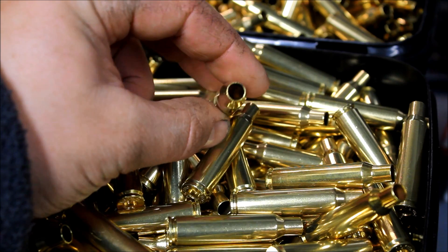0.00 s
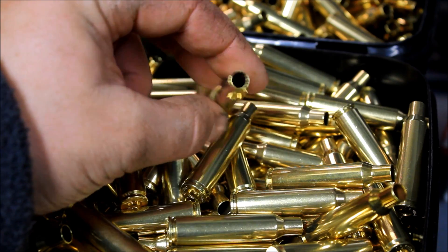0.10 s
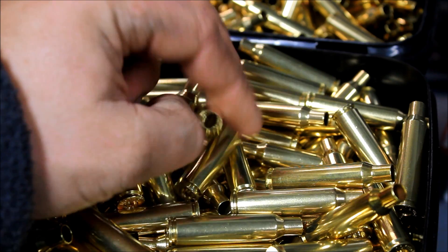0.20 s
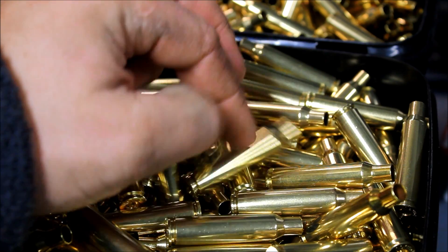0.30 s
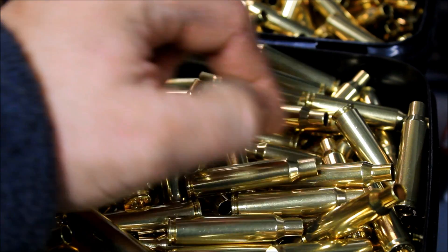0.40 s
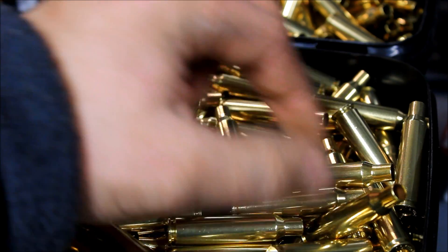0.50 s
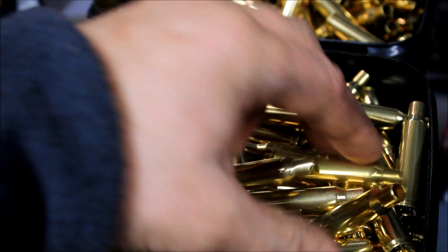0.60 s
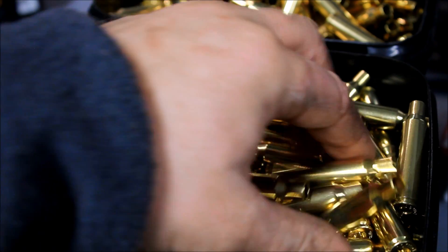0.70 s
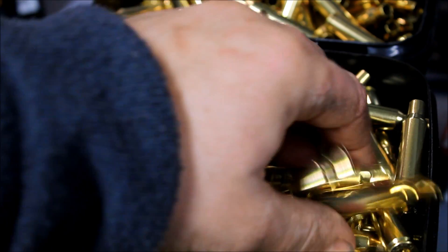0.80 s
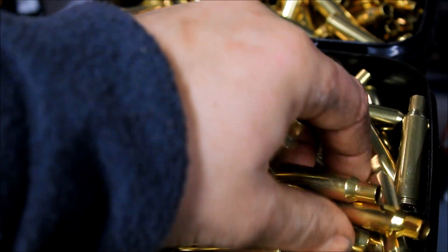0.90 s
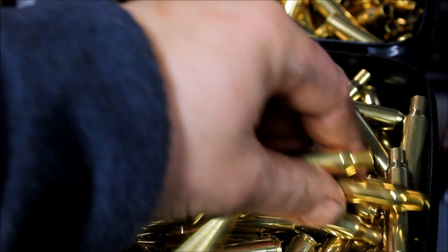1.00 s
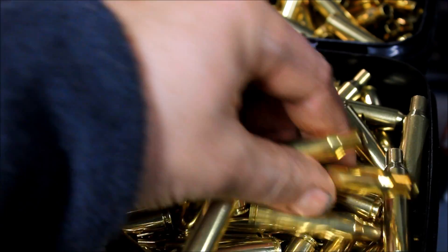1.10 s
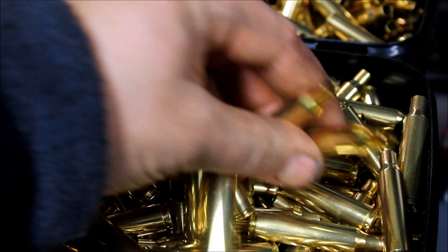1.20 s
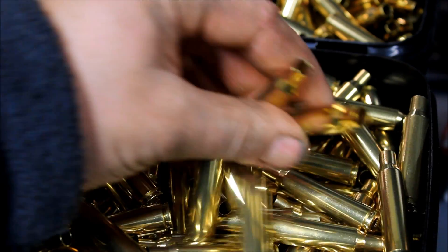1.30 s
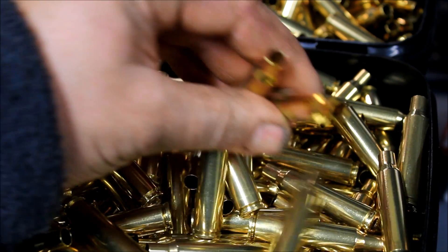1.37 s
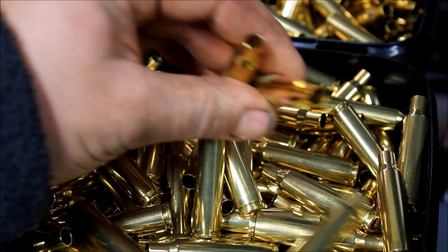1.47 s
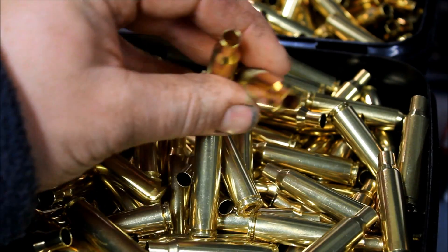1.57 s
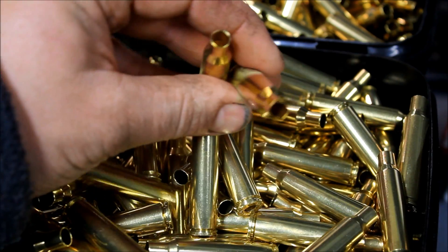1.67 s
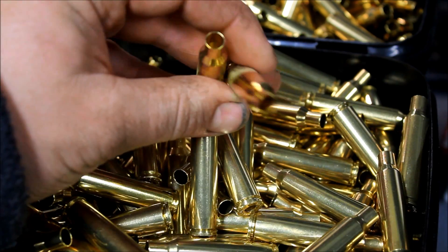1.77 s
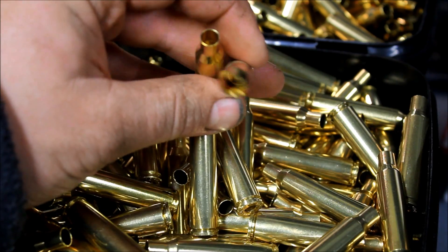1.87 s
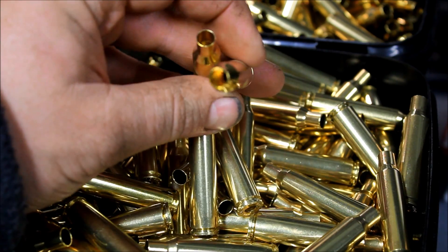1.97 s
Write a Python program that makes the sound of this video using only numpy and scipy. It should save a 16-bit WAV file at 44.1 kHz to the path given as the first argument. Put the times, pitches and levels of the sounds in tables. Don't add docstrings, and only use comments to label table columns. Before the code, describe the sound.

Empty brass cartridge cases clink and jingle as a hand stirs a full plastic tub, pauses briefly, digs in harder, then lifts a few and settles; close microphone in a small, quiet workshop with faint hum.

```python
import sys
import numpy as np
from scipy import signal
from scipy.fft import rfft, irfft
from scipy.io import wavfile
from scipy.ndimage import uniform_filter1d

SR = 44100
rng = np.random.default_rng(int(sys.argv[2]) if len(sys.argv) > 2 else 0)


def master_out(mix):
    frames = np.transpose(np.atleast_2d(mix))
    ceiling = np.clip(frames, -1, 1)
    pcm = np.round(ceiling * 32767).astype(np.int16)
    wavfile.write(sys.argv[1], SR, pcm)


def to_linear_factor(level_db):
    exponent = np.asarray(level_db, float) / 20
    return 10 ** exponent


N = 90405


def evened(x):
    return x / np.sqrt(np.mean(x ** 2) + 1e-20)


def coloured(x, points):
    f, level = np.transpose(points)
    hz = abs(np.fft.fftfreq(2048, 1 / SR))
    gain_db = np.interp(np.log(hz + 1), np.log(f), np.maximum(level, -90))
    log_gain = np.log(to_linear_factor(gain_db))
    taps = np.fft.ifft(np.exp(np.conj(signal.hilbert(log_gain)))).real
    taps = max(taps[:1024], taps[::-1][:1024], key=np.linalg.norm)
    return signal.oaconvolve(x, taps / np.linalg.norm(taps))[:len(x)]


def mode(hz, t60, length=.4):
    t = np.arange(int(length * SR)) / SR
    return np.sin(2 * np.pi * hz * t) * to_linear_factor(-60 * t / max(t60, .004))


def add(mix, s, sound):
    part = mix[round(s * SR):][:len(sound)]
    part += sound[:len(part)]


# f/Hz, level/dB
HISS_COLOUR = [(25, -6), (60, -16.5), (160, -17), (300, 1), (700, -7.5), (2100, -8.5), (6000, -22.5),
               (16000, -29)]
# f/Hz, level/dB rms
HUM_PARTIALS = [(100, -63), (297, -59.5), (395, -66)]


def workshop():
    hiss_db, waver_db = -49, 5.1
    t = np.arange(N) / SR
    hum = np.zeros(N)
    for hz, db in HUM_PARTIALS:
        waver = evened(uniform_filter1d(rng.standard_normal(N), 4000))
        tone = np.sin(2 * np.pi * (hz * t + rng.random()))
        hum += np.sqrt(2) * to_linear_factor(db + waver_db * waver) * tone
    f, level = np.transpose(HISS_COLOUR)
    hz = np.fft.rfftfreq(N, 1 / SR)
    gain = to_linear_factor(np.interp(np.log(hz + 1), np.log(f), level))
    hiss = irfft(rfft(rng.standard_normal(N)) * gain, N)
    return hum + to_linear_factor(hiss_db) * evened(hiss)


def ducking(x):
    from_db, share, memory_s, delay_s = -25, 0.72, 0.3, 0.23
    keep, lag = np.exp(-1 / (memory_s * SR)), np.exp(-1 / (delay_s * SR))
    power = signal.lfilter([1 - keep], [1, -keep], x ** 2)
    power = signal.lfilter([1 - lag], [1, -lag], power)
    excess_db = np.maximum(10 * np.log10(power + 1e-12) - from_db, 0)
    return to_linear_factor(-share * excess_db)


# t/s, peak level/dB, t60/s
LOW_RINGS = [(0.0727, -45, 0.13), (0.1511, -29.5, 0.062), (0.237, -31, 0.082), (0.252, -6.5, 0.17),
             (0.324, -16, 0.1), (0.3513, -19, 0.12), (0.39, -19.5, 0.14), (0.408, -25, 0.13),
             (0.4343, -10, 0.13), (0.446, -21, 0.16), (0.4985, -25, 0.059), (0.678, -4.5, 0.11),
             (0.6996, -10.5, 0.062), (0.7315, -16, 0.068), (0.801, -30, 0.055), (0.834, -9.5, 0.084),
             (0.845, -28.5, 0.086), (0.861, -22, 0.14), (0.869, -8, 0.076), (0.8744, -10.5, 0.14),
             (0.8838, -1, 0.12), (0.9034, -6, 0.045), (0.9262, -14.5, 0.18), (0.9754, -28, 0.15),
             (1.025, -14, 0.11), (1.0345, -18, 0.091), (1.105, -7.5, 0.12), (1.122, -23, 0.098),
             (1.2025, -6, 0.12), (1.242, -19, 0.16), (1.2857, -25.5, 0.12), (1.3324, -21, 0.11),
             (1.3455, -21.5, 0.14), (1.376, -13.5, 0.074), (1.3951, -4, 0.068), (1.417, -4, 0.14),
             (1.4319, -10.5, 0.073), (1.4689, -29, 0.12), (1.5706, -25.5, 0.074), (1.607, -40.5, 0.084),
             (1.6236, -17, 0.13), (1.6462, -21.5, 0.1), (1.7343, -22, 0.088)]
MID_RINGS = [(0.1501, -41, 0.099), (0.2369, -20, 0.11), (0.2593, -9, 0.068), (0.3242, -7, 0.065),
             (0.3576, -16, 0.1), (0.3925, -9, 0.094), (0.4414, -11, 0.12), (0.4579, -11, 0.062),
             (0.4985, -26, 0.089), (0.6764, -13.5, 0.12), (0.7003, -12, 0.082), (0.7277, -6, 0.11),
             (0.754, -8, 0.044), (0.837, -25, 0.098), (0.8674, -20.5, 0.1), (0.8944, -8, 0.12),
             (0.9075, -13, 0.11), (1.0243, -26, 0.12), (1.077, -37, 0.082), (1.096, -17, 0.12),
             (1.112, -4, 0.052), (1.2025, -4, 0.066), (1.239, -21, 0.12), (1.284, -22, 0.1),
             (1.3465, -16, 0.13), (1.3753, -16, 0.15), (1.397, -13.5, 0.086), (1.4165, -2.5, 0.055),
             (1.4315, -11.5, 0.099), (1.4556, -16.5, 0.17), (1.5818, -29, 0.11), (1.6062, -24.5, 0.14),
             (1.6197, -30, 0.11), (1.7367, -28.5, 0.12), (1.7558, -19.5, 0.16), (1.9555, -63.5, 0.19)]
TOP_RINGS = [
    (.2124, -23, 0.11),
    (.2523, -17, .08),
    (.341, -26, .1),
    (.4574, -16, 0.089),
    (.7527, -18, 0.092),
    (.831, -26, 0.065),
    (.8838, -18, 0.12),
    (1.372, -21, 0.11),
    (1.6437, -31, .1),
]
LOW_CASE_HZ = [9960, 9850, 9700, 9700, 9650, 9710, 9720, 9700, 9670, 9600, 9690, 9700, 9680, 9730, 9690,
               9930, 10160, 9900, 9740, 9750, 9660, 9670, 9650, 9640, 9700, 9830, 9800, 9810, 9630, 9920,
               9630, 9690, 9650, 9650, 9670, 9680, 9700, 9690, 9710, 9930, 9680, 9720, 9750]
MID_CASE_HZ = [12920, 13000, 13000, 12920, 12960, 12950, 12840, 12950, 12950, 12930, 12980, 12950, 12970,
               13040, 12930, 13020, 13030, 12990, 13180, 13000, 13040, 12910, 13010, 12910, 12950, 12920,
               12930, 12960, 13000, 12970, 12970, 12970, 12930, 12920, 12930, 13120]
TOP_CASE_HZ = [15430, 15450, 15430, 15710, 15700, 15700, 15690, 15550, 15700]


def rings(table, cases_hz):
    split_hz, twin_db = 52, -16.5
    linger_db, linger_t60_s = -37.5, 0.83
    rise_s, mute_db, rough_db = .0022, -5, 2.3
    out = np.zeros(N)
    chance = rng.uniform(-1.006, 1, (len(table), 2))
    t = np.arange(int(.4 * SR)) / SR
    following = [row[0] for row in table[1:]] + [N / SR]
    for (s, db, t60), hz, (a, b), then in zip(table, cases_hz, chance, following):
        twin = mode(hz + split_hz * (a + np.sign(a)), t60)
        pair = mode(hz, t60) + to_linear_factor(twin_db) * twin
        pair = pair * to_linear_factor(mute_db * np.clip((t + s - then) / .002, 0, 1))
        pair = pair + to_linear_factor(linger_db) * mode(hz + split_hz * b, linger_t60_s)
        add(out, s, to_linear_factor(db - 2.5) * np.minimum(t / rise_s, 1) * pair)
    rough = uniform_filter1d(uniform_filter1d(rng.standard_normal(N), 150), 100)
    return out * to_linear_factor(rough_db * evened(rough))


# t/s, peak level/dB, tub thud level/dB re peak
KNOCKS = [(.15, -27.5, -8), (.2131, -20, -19), (.2365, -14, -14.5), (.2522, -15.5, -21.5),
          (.3236, -7, -12.5), (.35, -19.5, -13), (.389, -17.5, -11), (.43, -21.5, -13),
          (.4405, -10, -13.5), (.456, -6, -18), (.4977, -22, -12), (.675, -14, -22),
          (.6987, -18, -31), (.7136, -13, -19.5), (.7391, -7.5, -23), (.7757, -8, -11.5),
          (.7935, -12.5, -27), (.8308, -5.5, -20.5), (.8385, -7, -24), (.86, -6.5, -22.5),
          (.8735, -7, -24.5), (.8842, -12, -48), (.9015, -12, -45), (.9152, -12, -24),
          (.944, -14, -25),
          (1.003, -21, -34), (1.0249, -8, -19.5), (1.0772, -22.5, -15), (1.093, -24.5, -35),
               (1.1025, -5.5, -23.5), (1.112, -9.5, -19.5), (1.1437, -20.5, -12.5), (1.171, -20.5, -20),
               (1.1993, -11.5, -23), (1.2402, -25.5, -25), (1.2824, -18.5, -30), (1.302, -14, -16.5),
               (1.345, -22.5, -31.5), (1.364, -25, -23), (1.3719, -24.5, -11.5), (1.3939, -9.5, -20.5),
               (1.4166, -15.5, -14), (1.4321, -14, -18.5), (1.5644, -26.5, -16), (1.5877, -24, -19),
               (1.6125, -17.5, -19.5), (1.6423, -20.5, -18), (1.6776, -30.5, -40), (1.73, -19, -17),
               (1.7537, -13, -19), (1.9165, -42, -8), (1.957, -41, -2.5)]
# f/Hz, level/dB, t60/s
TUB_MODES = [(240.7, -2, 0.11), (288, -5.5, 0.13), (387.4, -0.5, 0.066), (523, -3.5, 0.094),
             (607, -1, 0.047), (719.7, 1, 0.074), (802, -1, 0.051)]


def knocks():
    tick_t60_s, scatter_t60_s = 0.0011, 0.095
    knock_db, front_db, grit_db, tub_db = -12, 3, 3.5, -5
    table, t = KNOCKS, np.arange(8000) / SR
    crack, thud = np.zeros(N), np.zeros(N)
    grit = rng.standard_normal((len(table), len(t), 2))
    detune = rng.uniform(0.92, 1.03, (len(table), len(TUB_MODES)))
    for (s, db, thud_db), noise, shift in zip(table, grit, detune):
        lumps = to_linear_factor(grit_db * evened(uniform_filter1d(noise[:, 1], 40)))
        scatter = lumps * to_linear_factor(-60 * t / scatter_t60_s)
        tick = to_linear_factor(front_db - 60 * t / tick_t60_s)
        add(crack, s, to_linear_factor(db + knock_db) * (scatter + tick) * noise[:, 0])
        wall = sum(to_linear_factor(d) * mode(f * k, ring) for (f, d, ring), k in zip(TUB_MODES, shift))
        rise = np.minimum(np.arange(len(wall)) / (0.004 * SR), 1)
        add(thud, s, to_linear_factor(db + thud_db + tub_db) * wall * rise)
    return crack, thud


# t/s, peak level/dB, f/Hz
TICKS = [(.15, -29, 4000), (0.2538, -11, 7500), (0.3231, -3.5, 3600), (0.3248, -6, 5540),
         (.456, -5.5, 3790), (0.456, 0, 5400), (0.7758, -2.5, 3700), (.794, -5, 4040), (.831, -12, 6500),
         (0.8393, -1.5, 4200), (0.8744, -5, 3000), (.8845, -2, 7800), (0.9, -17, 7000), (.951, -23, 4040),
         (1.0248, -15, 4350), (1.104, -7, 4140), (1.1119, -3, 3900), (1.1433, -16, 3600),
         (1.2012, -13.5, 5500), (1.2817, -23, 3850), (1.3068, -15.5, 5000), (1.3458, -17, 6500),
         (1.364, -29, 4360), (1.372, -18.5, 3500), (1.3762, -8, 6300), (1.3958, -11.5, 4300),
         (1.417, -26, 7500), (1.431, -30, 7500), (1.587, -20.5, 3500), (1.73, -22, 4000),
         (1.956, -39, 3900)]


def ticks():
    ring_s, snap_db, ticks_db = .008, -3, -8.5
    out = np.zeros(N)
    for s, db, hz in TICKS:
        snap = mode(1.6 * hz, .004, .03) + mode(.55 * hz, .004, .03)
        add(out, s, to_linear_factor(db + ticks_db) * (mode(hz, ring_s, .03) + to_linear_factor(snap_db) * snap))
    return out


# start t/s, end t/s, rattle level/dB, tube air level/dB re rattle
STIR = [
    (0.197, 0.495, -43, -4.5),
    (0.698, 0.793, -27.5, -4.5),
    (0.85, 0.905, -32, -1.5),
    (0.96, 1.04, -39.5, 0.5),
    (1.024, 1.11, -38, -19),
    (1.277, 1.46, -38, -29.5),
    (1.56, 1.633, -46, 2.5),
]


def rattle():
    rattles_per_s, spread_db, contact_t60_s, settle_s = 650, 4., .03, 0.043
    tube_hz, tube_t60_s = 1450, .024
    t, grit, air = np.arange(N) / SR, np.zeros(N), np.zeros(N)
    size = to_linear_factor(spread_db * np.minimum(rng.exponential(1, N), 4))
    hits = size * (rng.random(N) < rattles_per_s / SR)
    envelope = signal.oaconvolve(hits, to_linear_factor(-60 * t[:2000] / contact_t60_s))[:N]
    contacts = evened(envelope * rng.standard_normal(N))
    for start, end, db, tube_db in STIR:
        settling = np.exp(-np.maximum(t - end, 0) / settle_s)
        stroke = to_linear_factor(db) * (t > start) * settling * contacts
        grit += stroke
        air += to_linear_factor(tube_db) * stroke
    tube = mode(tube_hz, tube_t60_s, 0.059)
    return grit, signal.oaconvolve(air, tube / np.linalg.norm(tube))[:N]


# f/Hz, level/dB
KNOCK_COLOUR = [(150, -14), (300, -23), (700, -2), (1800, -6), (4000, -2), (6000, -5), (11000, -7.5),
                (14600, -10)]
# f/Hz, spread between cases/Hz, level/dB, t60/s
HEAP_MODES = [(9700, 60, -6, .11), (12990, 70, -7, .11), (15640, 90, -13, .09), (10050, 220, -6, .025),
              (13200, 180, -10, .025)]


def heap(drive):
    out = coloured(drive, KNOCK_COLOUR)
    case = np.repeat(rng.integers(0, 10, N // 100 + 1), 100)[:N]
    for hz, spread_hz, db, t60 in HEAP_MODES:
        for k, offset in enumerate(rng.standard_normal(10)):
            ring = mode(hz + spread_hz * offset, t60, .2)
            ring = ring / np.linalg.norm(ring)
            out -= to_linear_factor(db) * signal.oaconvolve(drive * (case == k), ring)[:N]
    return out


# t/s, peak level/dB, f/Hz
TUBE_PUFFS = [
    (0.7147, -18, 1360),
    (0.7467, -21, 1440),
    (0.7816, -19.5, 1364),
    (0.838, -35, 1470),
    (0.879, -23.5, 1540),
    (0.914, -23.5, 1450),
    (1.027, -21, 1413),
    (1.11, -18.5, 797),
    (1.303, -24, 1395),
    (1.5873, -20.5, 1366),
]


def tubes():
    out = np.zeros(N)
    rise = np.minimum(np.arange(4410) / (0.00055 * SR), 1)
    for s, db, hz in TUBE_PUFFS:
        add(out, s, to_linear_factor(db) * mode(hz, .038, .1) * rise)
    return out


def scene():
    crack, thud = knocks()
    grit, air = rattle()
    walls = rings(LOW_RINGS, LOW_CASE_HZ) + rings(MID_RINGS, MID_CASE_HZ) + rings(TOP_RINGS, TOP_CASE_HZ)
    brass = walls + heap(crack + grit) + thud + air + tubes() + ticks()
    brass = signal.sosfilt(signal.butter(3, 170, "high", fs=SR, output="sos"), brass)
    return (brass + workshop() * ducking(brass))[None]


def low_pass(x):
    return signal.sosfilt(signal.butter(12, 17090, fs=SR, output="sos"), x)


def record(dry):
    edge = signal.firwin(601, 15790, window=("kaiser", 8), fs=SR)
    limited = signal.oaconvolve(np.clip(dry, -1, 1), edge[None], "same")
    return low_pass(np.clip(limited, -1, 1))


dry = scene()
out = record(dry)
master_out(out)
```